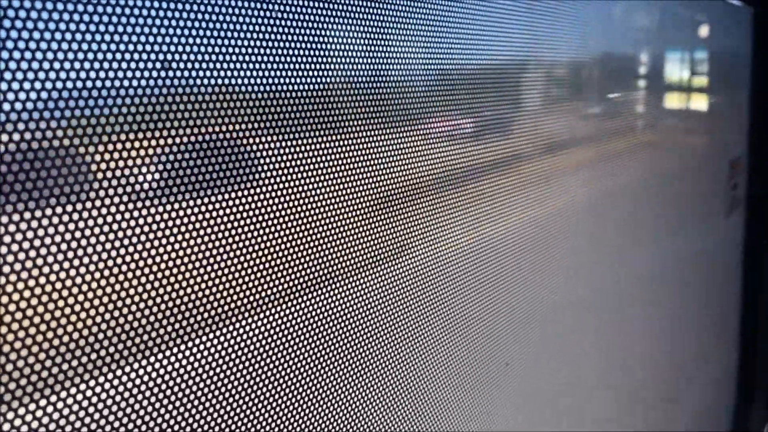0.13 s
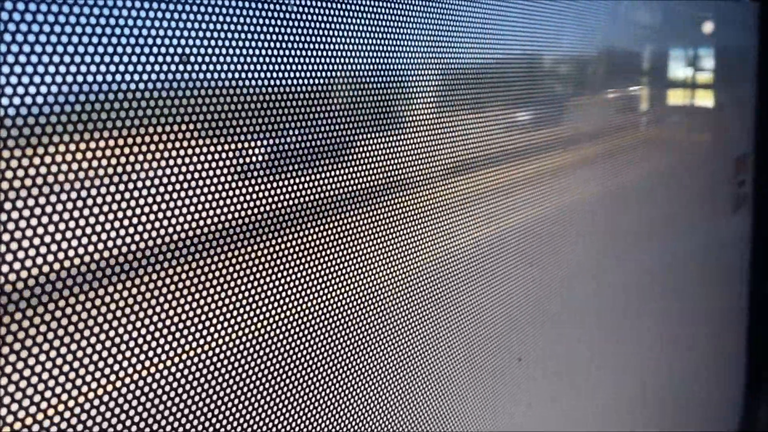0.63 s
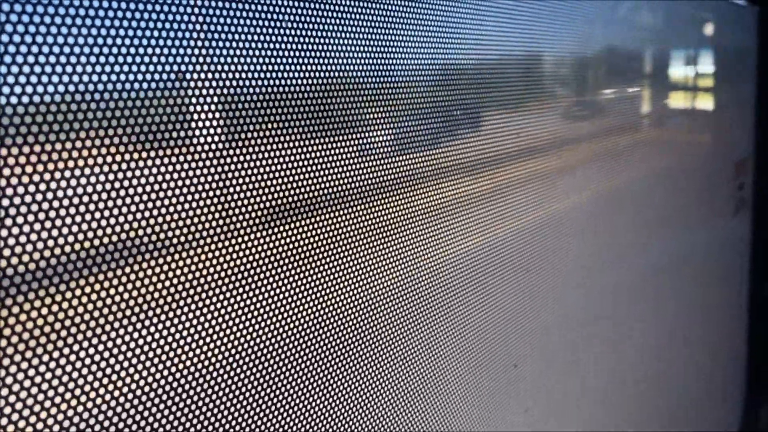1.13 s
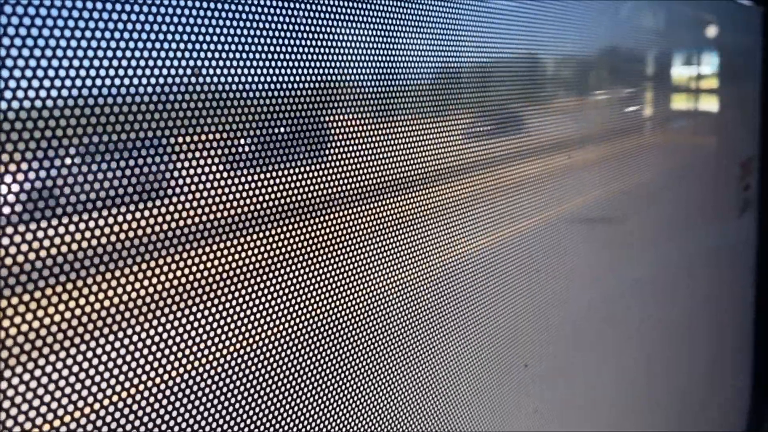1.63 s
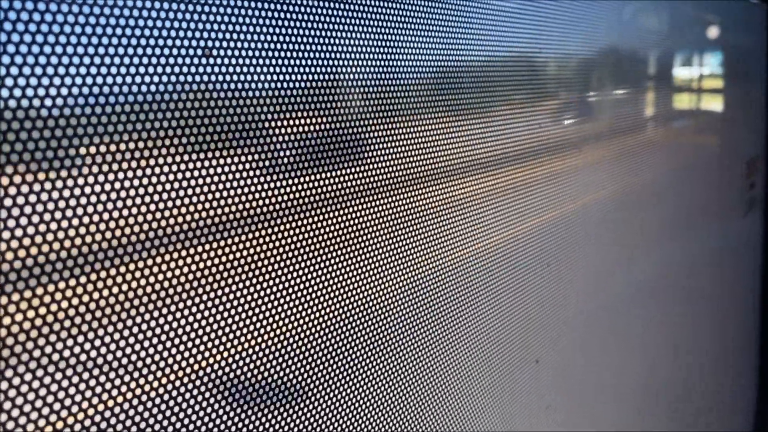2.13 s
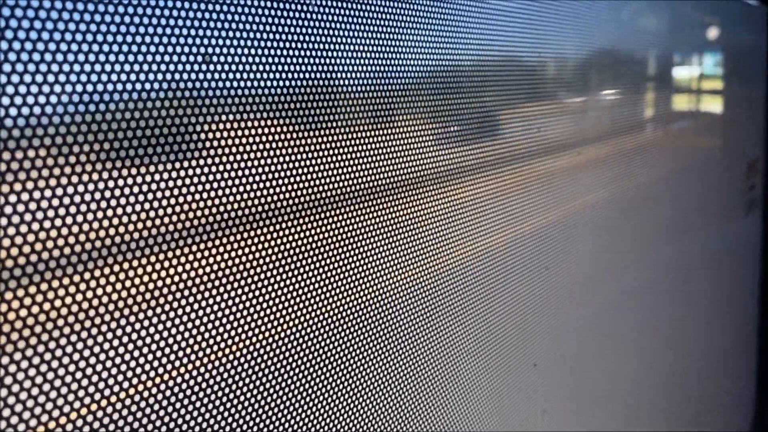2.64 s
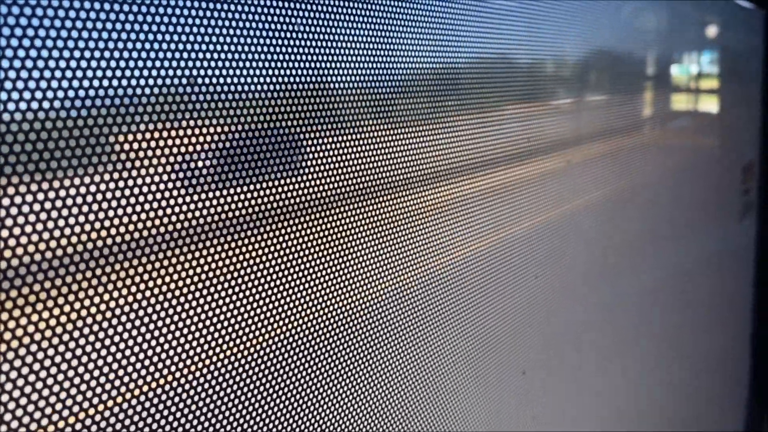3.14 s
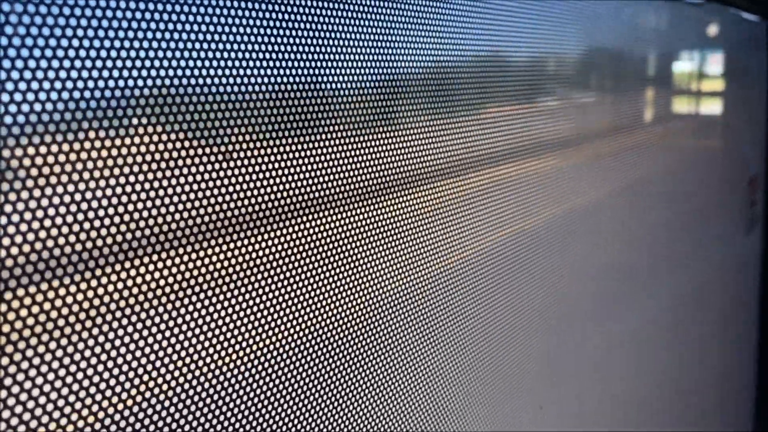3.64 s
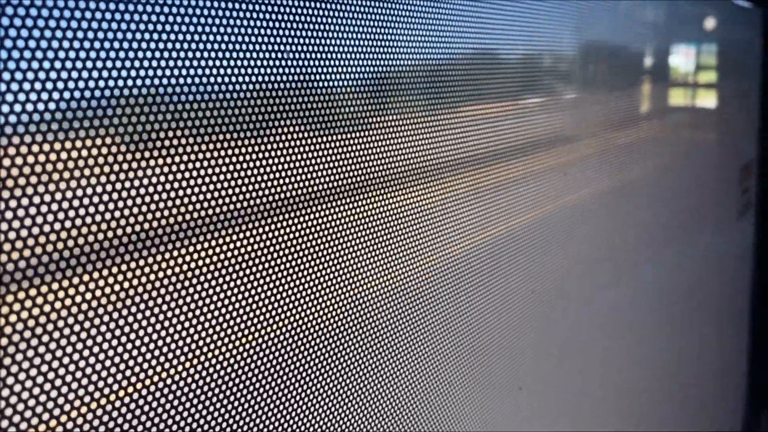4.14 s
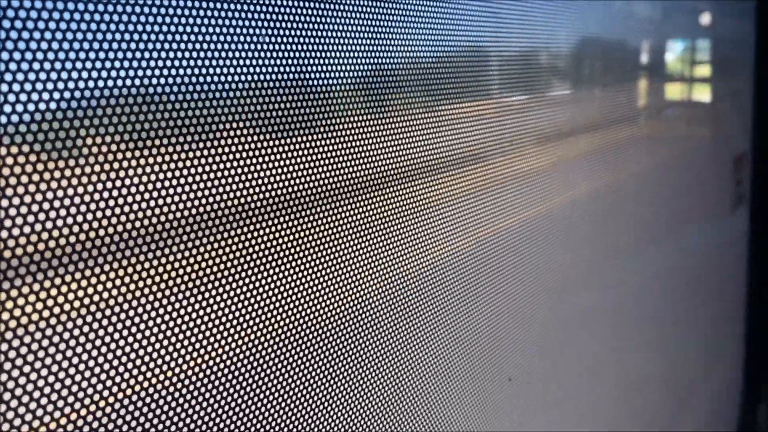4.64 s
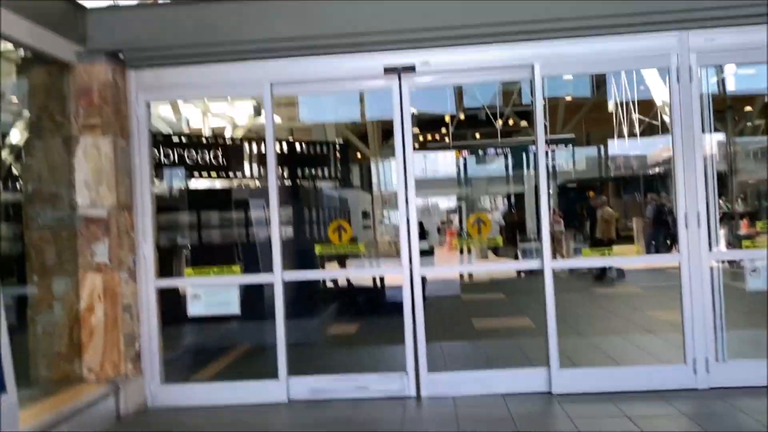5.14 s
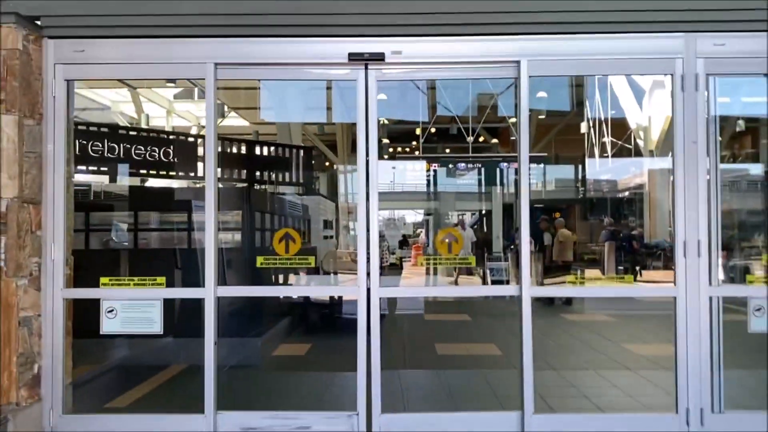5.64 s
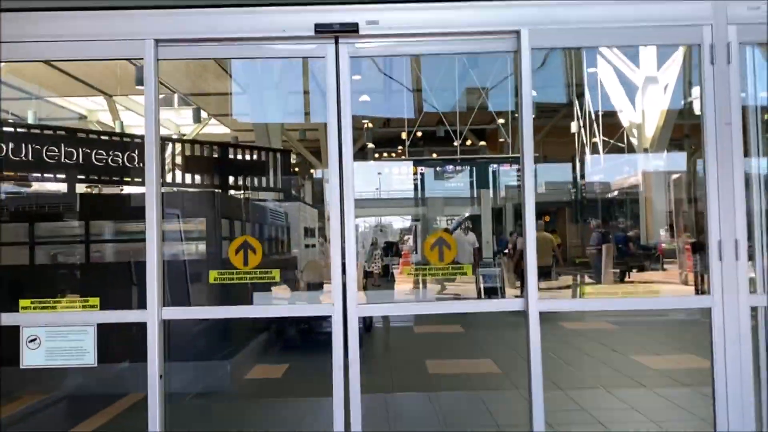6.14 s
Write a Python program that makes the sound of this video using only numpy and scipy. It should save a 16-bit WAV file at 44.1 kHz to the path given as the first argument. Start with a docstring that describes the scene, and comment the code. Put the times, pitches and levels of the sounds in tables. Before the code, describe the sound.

Inside a bus on the road, a deep diesel drone booms through the cabin over steady tyre roar and soft air hiss. Drivetrain whines climb slightly as it speeds up, with faint panel buzzes and whistles, then the driver eases off. At about five seconds it cuts hard to a much quieter covered entrance: distant traffic wash, a faint high squeal and a few dull footfalls on a handheld stereo microphone.

```python
"""Bus cabin, then covered entrance

On the road, sines at the diesel's orders boom in the cabin's modes. Shaped noise makes the tyre roar
and air hiss; noise-modulated carriers make drivetrain whines that rise with road speed, among thin
whistles and panel buzzes. A hard cut leads to a quiet covered entrance: far traffic wash of shaped
noise, a faint fuzzy tone, and short sine swells for soft footfalls, a knock and a tick."""
import sys
import numpy as np
from scipy import signal
from scipy.io import wavfile
from scipy.ndimage import uniform_filter1d

SR = 44100
rng = np.random.default_rng(int(sys.argv[2]) if len(sys.argv) > 2 else 0)


def volts_from_db(level):
    """Convert decibel levels to linear amplitude ratios."""
    exponent = np.asarray(level, float) / 20
    return 10 ** exponent


def digitize_waveform(pressure):
    """Quantize a signal to 16-bit integers and store it at the path in sys.argv[1].

    Rows of a 2-D input are taken as channels; values are limited to [-1, 1].
    """
    field = np.atleast_2d(pressure).T
    bounded = np.clip(field, -1, 1)
    quanta = np.round(bounded * 32767).astype(np.int16)
    wavfile.write(sys.argv[1], SR, quanta)


N = 276926
CUT_S, ENTRANCE_S = 5.0427, 5.0495  # the cabin ends, the entrance opens up
SLOW = 16  # engine orders and whine fuzz are built at SR / SLOW
LEFT_RIGHT = np.array([[1], [-1]])


def read(points, hz):
    """Reads a frequency table at hz along a log axis."""
    f, value = np.transpose(points)
    return np.interp(np.log(hz + 1), np.log(f + 1), value)


def evened(x):
    """Scales a signal to rms 1."""
    return x / np.sqrt(np.mean(x ** 2) + 1e-20)


def columns(rows, t):
    """Joins each column of a table by straight lines and reads it at t."""
    start, *curves = np.transpose(rows)
    return [np.interp(t, start, curve) for curve in curves]


def drift(t, rate_hz):
    """Slow random wander of rms 1: sines from 0.2 Hz to rate_hz, the slower ones stronger."""
    coarse = t[::len(t) // 600]
    wander = 0
    for f in np.geomspace(.2, rate_hz, 12):
        wander = wander + np.sin(2 * np.pi * (f * coarse + rng.random())) / np.sqrt(f)
    return np.interp(t, coarse, evened(wander))


def eased(t):
    """0 while the engine pulls, 1 once the driver eases off the pedal."""
    ease_s, width_s = 3.97, .2
    return .5 + .5 * np.tanh((t - ease_s) / width_s)


# Stereo phase of the noise.
# Each row: frequency in Hz, turns by which left leads right.
STEREO_PHASE = [(350, 0.0091), (650, 0.45), (1100, 0.87), (1500, 1.525), (2050, 1.95), (7300, 2.1),
                (8300, 2.42), (9600, 2.65), (10400, 2.6), (11700, 5.6), (12400, 3.9), (13750, 3.65),
                (15000, 3.9)]
# High bands where left and right are equal or opposite.
# Each row: low edge in Hz, high edge in Hz, sign of right against left.
LOCKED_BANDS = [(8350, 9600, -1), (10400, 11700, 1), (12400, 13750, -1), (15000, 16000, 1)]


def noise(t, gain, same, patchy_db):
    """Stereo noise of rms 1 from random short-time spectra; gain(hz, t) shapes the magnitude."""
    frames, hz = len(t) // 512 + 5, np.fft.rfftfreq(2048, 1 / SR)
    a, b, c, d, patches = rng.standard_normal((frames, 1025, 5)).T
    patches = uniform_filter1d(patches, 8, 0)  # across frequency
    patches = evened(uniform_filter1d(patches, 5, 1))  # across time
    left, other = a + 1j * b, c + 1j * d
    likeness = np.clip(read(same, hz), 0, 1)
    f, turns = np.transpose(STEREO_PHASE)
    lag = np.exp(-2j * np.pi * np.interp(hz, f, turns))
    for low, high, sign in LOCKED_BANDS:
        band = (hz > low) & (hz < high)
        likeness[band], lag[band] = 1, sign
    likeness, lag = likeness[:, None], lag[:, None]
    right = lag * (likeness * left + np.sqrt(1 - likeness ** 2) * other)
    spectra = np.array([left, right])
    frame_s = t[0] + np.arange(frames) * 512 / SR
    spectra *= gain(hz, frame_s) * volts_from_db(patchy_db * patches)
    sound = signal.istft(spectra, nperseg=2048, noverlap=1536)[1]
    return evened(sound[:, :len(t)])


# Spectrum of the far traffic wash.
# Each row: frequency in Hz, relative density in dB per Hz.
WASH_SPECTRUM = [(20, -25), (40, -15), (62, -6), (120, -10), (250, -14.5), (500, -16), (900, -23),
                 (1400, -29.5), (1700, -26.5), (2000, -34), (2500, -33.5), (3100, -39), (3400, -36.5),
                 (3800, -41), (7000, -46.5), (10000, -53.5), (14500, -60), (15700, -64), (15900, -95)]
# Stereo spread of the wash.
# Each row: frequency in Hz, left-right likeness from 0 to 1.
WASH_LIKENESS = [(60, .82), (200, 0.87), (700, 0.052), (1300, 0.077), (2600, 0.24), (4400, 0.43),
                 (5500, 0.11), (7000, .6), (8000, 0.3)]


def far_wash(t):
    """Traffic wash as patchy shaped noise: its treble creeps up and it swells briefly once."""
    level_db, treble_db, treble_rise_db_per_s = -33.5, -4.5, 0.5
    gust_s, gust_width_s, gust_db = 5.97, 0.083, 1.5

    def gain(hz, frame_s):
        tilt_db = treble_db + treble_rise_db_per_s * (frame_s - ENTRANCE_S)
        treble_share = np.clip(hz / 5000, 0, 1)[:, None]
        return volts_from_db(read(WASH_SPECTRUM, hz)[:, None] + treble_share * tilt_db)

    swell_db = gust_db * np.exp(-((t - gust_s) / gust_width_s) ** 2)
    return noise(t, gain, WASH_LIKENESS, patchy_db=1.5) * volts_from_db(level_db + swell_db)


def squeal(t):
    """A faint fuzzy tone outside: noise through a narrow resonance, fading and flickering."""
    hz, width_hz, level_db, fade_db_per_s = 3400, 60.0, -60.5, 3
    r = np.exp(-np.pi * width_hz / SR)
    resonance = [1, -2 * r * np.cos(2 * np.pi * hz / SR), r * r]
    fuzz = evened(signal.lfilter([1], resonance, rng.standard_normal(len(t))))
    fade_db = fade_db_per_s * (t - ENTRANCE_S)
    right = .43  # gain against left
    return fuzz * volts_from_db(level_db - fade_db + 3.0 * drift(t, 20.0)) * np.array([[1], [right]])


# Soft footfalls, a knock and a faint tick.
# Each row: start in seconds, envelope peak in dB, pitch in Hz, half the rise time in seconds.
FOOTFALLS = [(5.333, -21.5, 66, .011), (5.915, -30, 65, .011), (5.972, -33, 340, .007),
             (6.058, -24, 62, .011), (6.175, -53, 6300, .002)]


def footfalls(t):
    """Each contact is a sine under an envelope that rises quickly and dies away."""
    out = np.zeros(len(t))
    for start, db, hz, span in FOOTFALLS:
        u = np.maximum(t - start, 0) / span
        envelope = u ** 2 * np.exp(2 - u) / 4  # reaches 1 at u = 2
        out += volts_from_db(db) * envelope * np.sin(2 * np.pi * hz * (t - start))
    return out


def entrance(t):
    """The covered entrance, held 20 dB down just after the cut and then opened in 3 ms."""
    opening = np.clip((t - ENTRANCE_S) / 0.003, .1, 1)
    return (far_wash(t) + squeal(t) + footfalls(t)) * opening


# Tyres, panels and ventilation together.
# Each row: frequency in Hz, relative density in dB per Hz.
ROAR_SPECTRUM = [(20, -25), (35, -20.5), (55, -3.5), (75, -4.5), (110, -7.5), (165, -10), (210, -15.5),
                 (290, -10), (350, -14), (450, -12.5), (620, -13), (850, -21), (1400, -27.5), (2300, -31),
                 (2800, -35), (3300, -41), (5000, -44), (7000, -49), (11000, -52), (14500, -51),
                 (15200, -57), (15700, -58), (15900, -82)]
# Stereo spread of the cabin noise.
# Each row: frequency in Hz, left-right likeness from 0 to 1.
CABIN_LIKENESS = [(60, 0.85), (140, 1), (330, 0.26), (600, 0.43), (1500, 0.069), (2800, 0.38), (4500, 0.53),
                  (5600, .25), (7200, 0.98), (8000, 0.47)]
# Stereo lean of the cabin, for the roar and the engine.
# Each row: frequency in Hz, left over right in dB.
CABIN_LEAN = [(60, 0), (130, 0), (290, 2.5), (640, 1), (1410, 0.0), (3100, 2), (6820, 2.5), (15000, 3)]
# How the bus is driven, for the roar and all that follows road speed.
# Each row: time in seconds, road speed as a factor on the whines, drive load in dB.
DRIVING = [(0, 1.0, -13), (1.5, 1.002, -11), (2, 1.012, -7.5), (2.4, 1.025, -2.5), (2.9, 1.04, -4),
           (3.25, 1.051, 0), (3.55, 1.059, -.5), (3.8, 1.063, -6), (5.05, 1.065, -7)]


def roar(t):
    """Road noise grows with speed; the air hiss swells slowly and softens when the driver eases off."""
    cruise_db, rise_db = -21, 2
    hiss_db, swing_db, period_s, peak_s = 0.35, 1, 4.34, 0.35
    hiss_ease_db = 1.0

    def gain(hz, frame_s):
        lean_db = read(CABIN_LEAN, hz) / 2 * LEFT_RIGHT
        spectrum_db = (read(ROAR_SPECTRUM, hz) + lean_db)[:, :, None]
        swing = swing_db * np.cos(2 * np.pi * (frame_s - peak_s) / period_s)
        air_db = hiss_db + swing - hiss_ease_db * eased(frame_s)
        air_share = np.clip(hz / 4000, 0, 1)[:, None]
        return volts_from_db(spectrum_db + air_share * air_db)

    faster = np.clip((columns(DRIVING, t)[0] - 1) / 0.022, 0, 1)
    swell_db = .35 * drift(t, 6.0)
    level = volts_from_db(cruise_db + rise_db * faster + swell_db)
    return level * noise(t, gain, CABIN_LIKENESS, patchy_db=1)


def thin_tone(start, length, hz, db, right, t, factor):
    """A thin sine at hz times factor that swells, flickers and fades, with a wandering phase."""
    flicker_db, flicker_hz = 3.5, 15.0
    edge_db = 7.0  # it starts and ends this far under its peak
    u = (t - start) / length
    on = (u > 0) & (u < 1)
    swell_db = -edge_db * (2 * u - 1) ** 2 * on
    level = on * volts_from_db(db + swell_db + flicker_db * drift(t, flicker_hz))
    phase = 2 * np.pi * hz * np.cumsum(factor) / SR + .8 * drift(t, flicker_hz)
    return np.sqrt(2) * level * np.sin(phase) * np.array([[1], [right]])


# Panel buzzes at a fixed pitch.
# Each row: start in seconds, length in seconds, pitch in Hz, peak of the swell in dB rms before
# flicker, gain of right against left.
PANEL_BUZZES = [(1.65, .9, 2135, -47, .95), (1.95, .35, 1612, -53, 1), (2.85, .85, 1618, -49, 1),
                (2.2, .35, 1970, -53, 1), (2.0, .8, 613, -38, .9), (1.4, .7, 7490, -65, .9)]


def buzzes(t):
    """Panels sound at their own fixed pitches, whatever the road speed."""
    return sum(thin_tone(*row, t, np.ones(len(t))) for row in PANEL_BUZZES)


# Thin whistles that rise with road speed.
# Each row: start in seconds, length in seconds, pitch in Hz at speed factor 1, peak of the swell
# in dB rms before flicker, gain of right against left.
SPEED_WHISTLES = [(1.5, .3, 6375, -62, 1), (1.87, .75, 6395, -56, 1), (2.75, .2, 6395, -62, 1),
                  (3.2, .3, 6395, -60, 1), (1.95, .35, 5900, -62, -.9), (2.05, .3, 7415, -63, .9)]


def whistles(t):
    """The pitch of each whistle is multiplied by the road speed factor."""
    speed = columns(DRIVING, t)[0]
    return sum(thin_tone(*row, t, speed) for row in SPEED_WHISTLES)


# Drivetrain whines.
# Each row: pitch in Hz at speed factor 1, width in Hz, level in dB at full load before easing and
# throb, share of the load followed, left over right in dB, throb depth from 0 to 1, steady tone
# against fuzz.
GEAR_WHINES = [(299, 2, -33, -.3, 3, 0, 1.5), (585, 10, -37.5, .5, 1, 0, .6),
               (918, 18, -36, 1.2, 0, .7, .9), (905, 70, -34.5, 1, 0, .4, 0), (1210, 60, -44, .3, 0, 0, 0),
               (2090, 90, -47, .1, 0, 0, 0)]


def gears(t):
    """Fuzzy whines: a carrier at road speed times noise as narrow as the whine."""
    shaft_hz = 12.8  # turns a second of the drive shaft at speed factor 1
    ease_db = 3.0  # the whines soften when the driver eases off
    speed, load_db = columns(DRIVING, t)
    travel = np.cumsum(speed) / SR
    # steady tooth tone, leaning left: rows are cosine and sine, columns are left and right
    tooth = np.array([[1, 0.24], [0, 0.036]])[:, :, None]
    out = 0
    for hz, width_hz, db, share, left_db, throb, steady in GEAR_WHINES:
        r = np.exp(-np.pi * width_hz * SLOW / SR)
        hiss = rng.standard_normal((2, 2, len(t) // SLOW + 1))
        fuzz = signal.lfilter([1], [1, -2 * r, r * r], hiss)
        fuzz = fuzz + .5 * fuzz[:, ::-1]  # partly shared by left and right
        sway = np.repeat(evened(fuzz) + steady * tooth, SLOW, axis=2)[:, :, :len(t)]
        phase = 2 * np.pi * hz * travel
        tone = evened(sway[0] * np.cos(phase) + sway[1] * np.sin(phase))
        tone *= 1 + throb * np.cos(2 * np.pi * shaft_hz * travel)  # once-a-turn beat of the shaft
        level_db = db + share * load_db - ease_db * eased(t)
        out = out + tone * volts_from_db(level_db) * volts_from_db(left_db / 2 * LEFT_RIGHT)
    return out


# Booming modes of the cabin.
# Each row: centre in Hz, width in Hz, dB rms that the mode alone gives a 0 dB order at its centre.
CABIN_MODES = [(71.9, 3.7, -26), (87.03, 2.4, -17.5), (106.7, 13, -21), (144.9, 7.6, -25),
               (159.6, 6.2, -23.5), (190.8, 22, -35.5), (234.3, 26.6, -32.5), (276, 4.7, -26.5),
               (324, 28.7, -32), (379.3, 18.4, -26.5)]


def boom(hz):
    """Complex gain of the cabin's modes; neighbours cancel between their peaks."""
    return sum(volts_from_db(db) / (1 + 2j * (hz - f) / width) for f, width, db in CABIN_MODES)


# Trend of the engine orders' strength, joined by straight lines.
# Each row: multiple of the engine cycle, strength in dB before the extras for standout orders.
ORDER_STRENGTH = [(4, -6.5), (6, -1.5), (10, -2), (14, -.5), (17, -5.5), (20, -6.5), (23, -3), (29, -5.5),
                  (31, -7), (33, -9.5), (36, -13.5)]


def orders():
    """Multiples of the engine cycle with their dB; low thirds and high evens stand out."""
    k = np.arange(4, 37)
    third = (k % 3 == 0) & (k < 24.5)
    even = (k % 2 == 0) & (k > 25.5)
    third_db = 2.5 * third
    even_db = (1.5 + 1.0426 * (k - 25.5)) * even  # more and more towards the top
    return zip(k, columns(ORDER_STRENGTH, k)[0] + third_db + even_db)


# Pace of the engine.
# Each row: time in seconds, engine cycles a second.
ENGINE_PACE = [(0.0, 11.71), (0.6, 11.55), (0.9, 11.38), (1.35, 10.98), (1.65, 11.25), (2.3, 11.69),
               (2.7, 11.8), (2.9, 11.94), (3.25, 12.38), (3.6, 12.29), (3.92, 12.13), (4.2, 12.37),
               (4.45, 12.01), (4.7, 11.78), (5.05, 11.67)]


def engine(t):
    """Each order is a sine that swells as it crosses a cabin mode; uneven firing makes it waver."""
    ease_db_per_order = .05  # upper orders soften most when the driver eases off
    slow_t = t[::SLOW]
    cycle_hz = columns(ENGINE_PACE, slow_t)[0]
    turns = np.cumsum(cycle_hz) * SLOW / SR
    out = 0
    for k, db in orders():
        level_db = db - ease_db_per_order * k * eased(slow_t) + 1.9 * drift(slow_t, 5.0)
        level = boom(k * cycle_hz) * volts_from_db(level_db)
        waver = .15j * drift(slow_t, 3.7)
        tone = np.sqrt(2) * level * np.exp(2j * np.pi * (k * turns + rng.random()) + waver)
        apart = np.exp(.011j * k * LEFT_RIGHT)  # higher orders are further out of step left to right
        lean = volts_from_db(read(CABIN_LEAN, k * cycle_hz.mean()) / 2 * LEFT_RIGHT)
        out = out + (tone * apart).real * lean
    return signal.resample_poly(out, SLOW, 1, axis=1)[:, :len(t)]


def scene():
    """The cabin up to the cut, a few ms of near silence, then the entrance."""
    before, after = np.split(np.arange(N) / SR, [round(CUT_S * SR)])
    thin = buzzes(before) + whistles(before)
    cabin = roar(before) + thin + gears(before) + engine(before)
    return np.concatenate([cabin, entrance(after)], axis=1)


def band_limit(x):
    """A steep low-pass at the top of the band."""
    return signal.sosfilt(signal.butter(12, 16410, fs=SR, output="sos"), x)


def record(dry):
    """The preamp saturates smoothly and rounds off the loudest booms."""
    knee = 1.3
    mix = knee * np.tanh(dry / knee)
    return band_limit(mix)


dry = scene()
out = record(dry)
digitize_waveform(out)
```